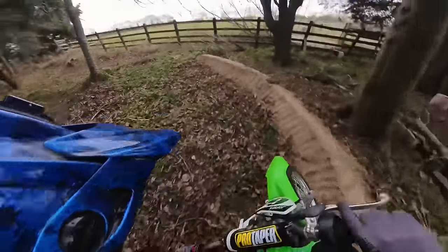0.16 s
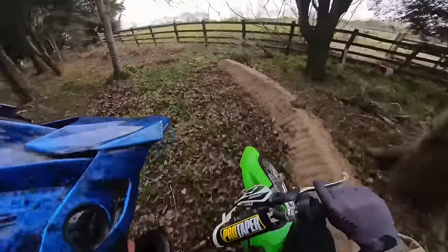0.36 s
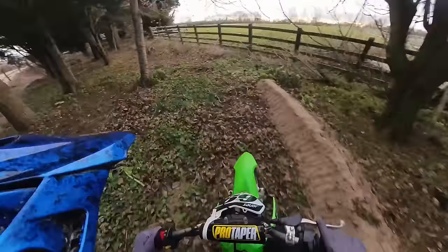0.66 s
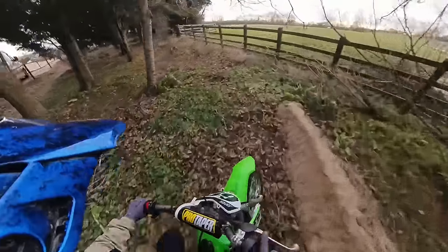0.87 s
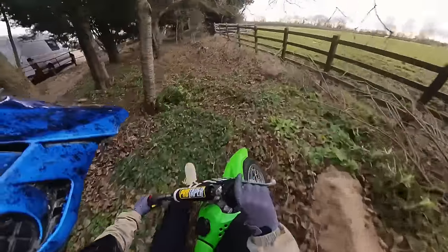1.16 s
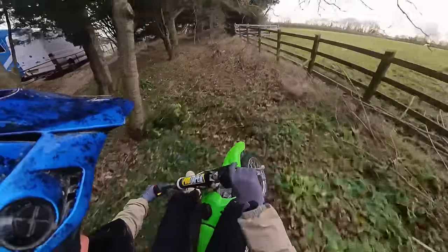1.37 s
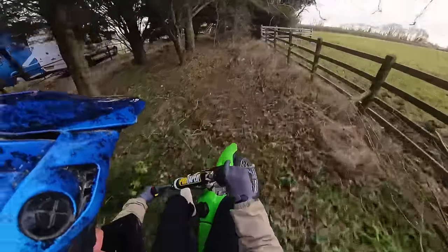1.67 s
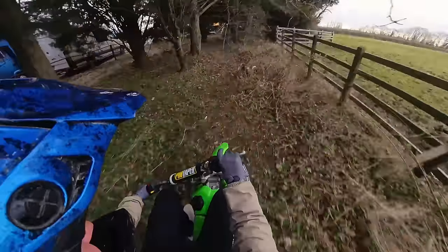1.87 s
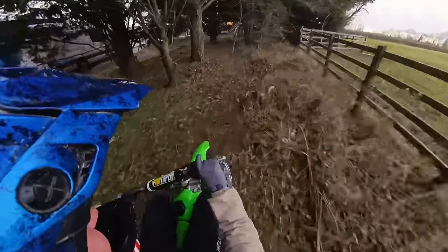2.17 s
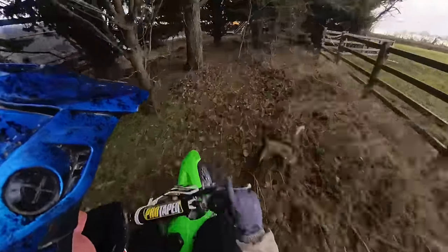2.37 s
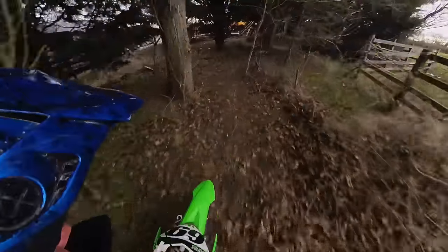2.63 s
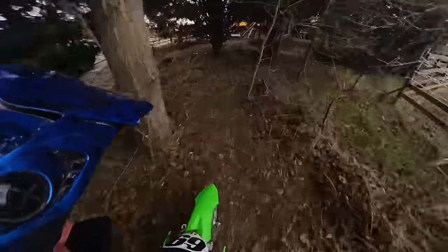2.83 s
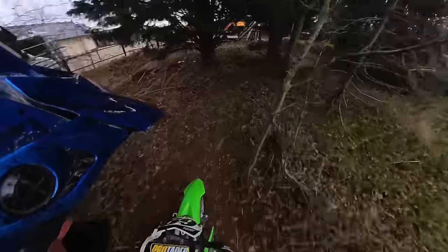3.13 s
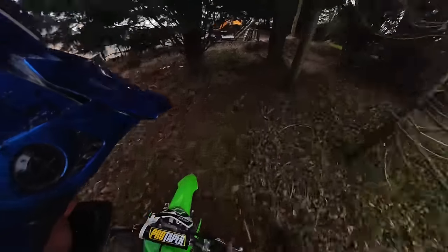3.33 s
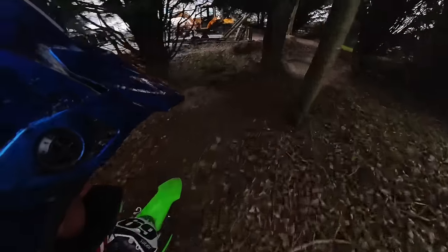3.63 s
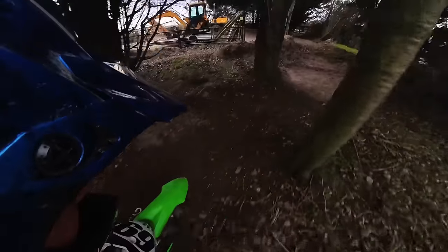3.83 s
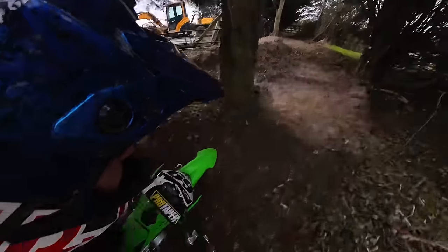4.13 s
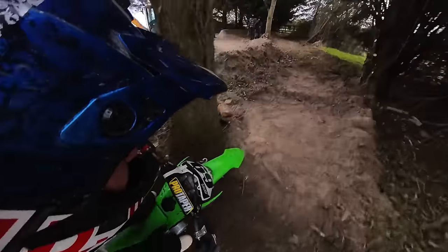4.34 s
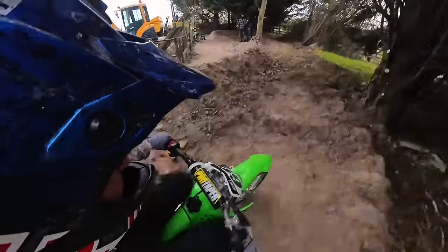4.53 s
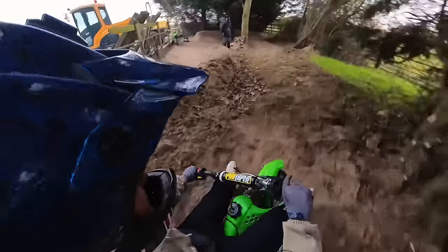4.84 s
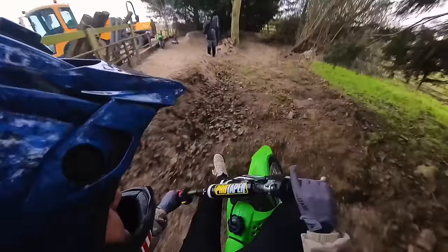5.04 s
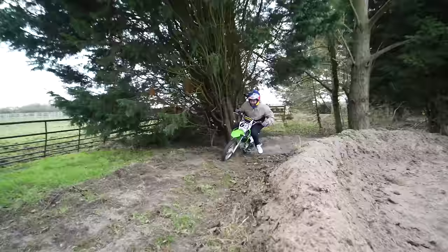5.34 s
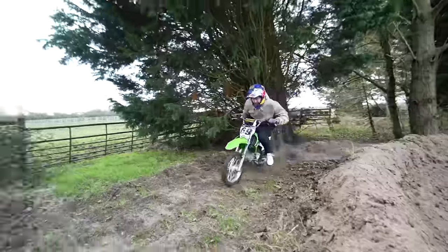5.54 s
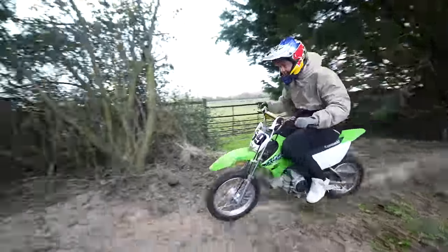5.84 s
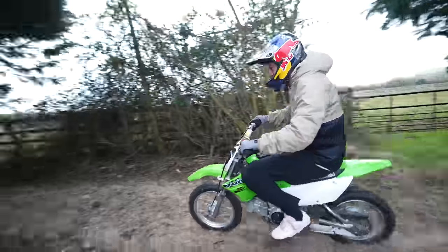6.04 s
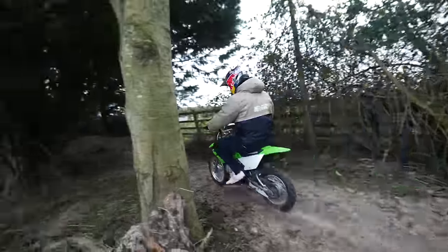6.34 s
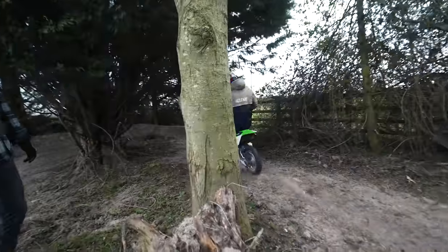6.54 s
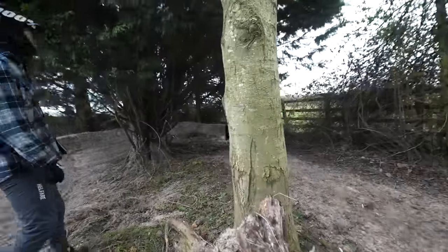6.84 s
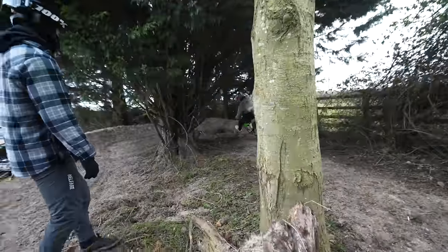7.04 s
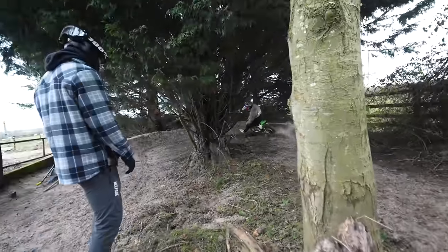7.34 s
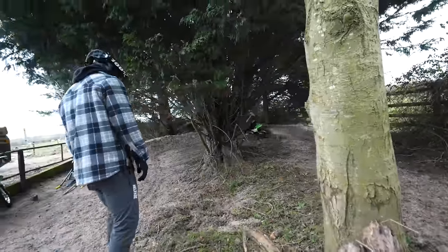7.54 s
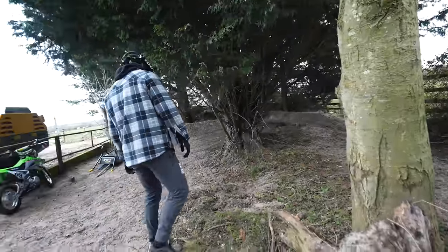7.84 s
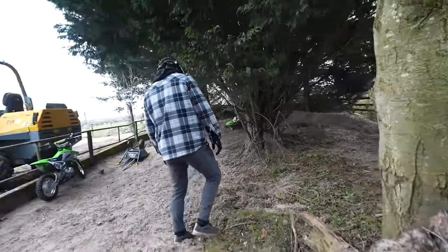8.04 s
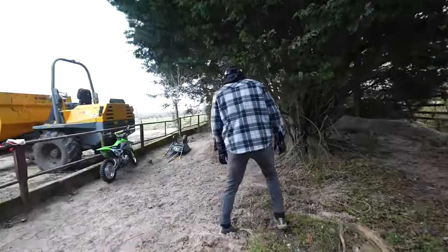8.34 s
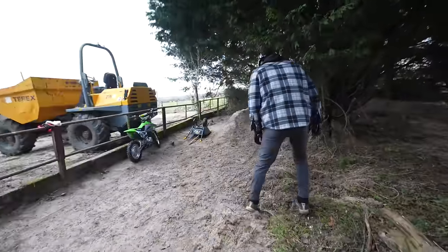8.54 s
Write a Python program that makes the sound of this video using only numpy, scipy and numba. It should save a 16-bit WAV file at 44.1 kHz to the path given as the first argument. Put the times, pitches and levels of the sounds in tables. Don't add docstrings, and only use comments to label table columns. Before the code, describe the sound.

Muffled single-cylinder engine surges and sags through bends with wind hiss and snapping twigs, then barks past outdoors and recedes behind trunks.

```python
import sys
import numpy as np
from scipy import signal
from scipy.io import wavfile
from scipy.ndimage import uniform_filter1d
from numba import njit

SR = 44100
rng = np.random.default_rng(int(sys.argv[2]) if len(sys.argv) > 2 else 0)


def materialize(psi):
    bounded = np.clip(np.atleast_2d(psi).T, -1, 1)
    quanta = np.round(bounded * 32767).astype(np.int16)
    wavfile.write(sys.argv[1], SR, quanta)


def boost_factor(decibels):
    exponent = np.asarray(decibels, float) / 20
    return 10 ** exponent


N = 383669

# start_s, throttle (0-1), pipe_level_db, pipe_centre_hz
RIDER = [(0, 0.97, -26.5, 338), (.2, 0.86, -22, 297), (.38, 1, -17, 308), (.6, 1, -22.5, 307),
         (.95, 0.68, -21, 308.4), (1.25, 0.99, -18.5, 293.2), (2, 0.91, -18.5, 303), (2.35, 0.9, -18, 283),
         (2.9, 0.9, -20, 287), (3, 0.35, -21.5, 339), (3.4, 0.29, -24, 297), (3.62, 0.84, -24.5, 324),
         (3.76, 1, -22, 269), (3.95, 0.99, -23.5, 347), (4.55, 0.99, -26, 352), (4.8, 0.94, -20.5, 300),
         (4.92, 0.66, -16.5, 231), (5.08, 0.92, -21, 287), (5.25, 0.87, -18.5, 325), (5.4, 1, -16.5, 324),
         (5.6, 0.9, -17, 305)]
# start_s, nearness_db, facing (silencer towards us, 0-1), silencer_hz, crank_load_db
BIKE = [(5, -35, 0.4, 470, -26), (5.07, -27.5, 0, 494, -38.5), (5.15, -28, 0.3, 533, -40),
        (5.25, -25.5, 0.06, 606, -9), (5.36, -25.5, 0.36, 586, -20.5), (5.5, -28.5, 0.6, 608, -16),
        (5.7, -29.5, 0.65, 639, -17.5), (5.85, -30.5, 0.48, 628, -15.5), (6.02, -29.5, 0.58, 570.7, -19),
        (6.2, -29, 0.64, 462, -19.5), (6.33, -33.5, 0.74, 470, -20), (6.6, -30.5, 0.3, 436, -25.5),
        (6.68, -36, 0.57, 338, -16.5), (6.88, -41.5, 0.82, 278, -43), (7.2, -40.5, 0.57, 266, -34),
        (7.3, -38, 0, 337, -28), (7.45, -33.5, 0.12, 420, -25), (7.6, -35, 0, 428, -26),
        (7.75, -36.5, 0.15, 420, -25), (7.92, -41.5, 0.1, 427, -22.5), (8.02, -38, 0.13, 450, -16),
        (8.2, -39.5, 0.3, 448, -17), (8.36, -40, 0.24, 495, -21), (8.47, -37.5, 0.37, 610, -17.5),
        (8.7, -36.5, 0.42, 704, -18)]
PASS_S = 6.2


def curves(table):
    s, *columns = np.transpose(table)
    return [np.interp(np.arange(N) / SR, s, column) for column in columns]


def switched(start_s, length_s, edge_s=.005):
    t = np.arange(N) / SR
    return np.clip(np.minimum(t - start_s, start_s + length_s - t) / edge_s + .5, 0, 1)


def walk(rate):
    hold = int(SR / rate)
    steps = np.repeat(rng.standard_normal(N // hold + 1), hold)
    return 2.0 * uniform_filter1d(uniform_filter1d(steps, hold), hold)[:N]


def unit(x):
    return x / np.sqrt(np.mean(x ** 2))


def delayed(x, lag_s):
    return np.roll(x, int(lag_s * SR))


def lowpass(x, hz, order=2):
    return signal.lfilter(*signal.butter(order, hz, fs=SR), x)


@njit
def svf(x, hz, width):
    y, b, l = np.empty(len(x)), 0., 0.
    for i in range(len(x)):
        g, k = np.tan(np.pi * hz[i] / SR), width[i] / hz[i]
        v = (b + g * (x[i] - l)) / (1 + g * (g + k))
        b, l, y[i] = 2 * v - b, l + 2 * g * v, k * v
    return y


def band(x, hz, width, order=2):
    hz, width = np.ones(len(x)) * hz, np.ones(len(x)) * width
    for _ in range(order):
        x = svf(x, hz, width)
    return unit(x / np.sqrt(width))


def ring(x, modes, scale=0.905, wide=1):
    total = 0
    for k, (hz, width, db) in enumerate(modes):
        total = total + (-1) ** k * boost_factor(db) * band(x, hz * scale, 1.117 * width * wide)
    return unit(total)


def beats(turn, hz, jitter_s, scatter_db):
    count = np.arange(np.ceil(turn[0]), turn[-1])
    chance = rng.standard_normal((600, 2))[:len(count)]
    at = np.clip(np.interp(count, turn, np.arange(N)) + jitter_s * SR * chance[:, 0], 0, N - 2)
    i = at.astype(int)
    size = boost_factor(scatter_db * chance[:, 1]) / np.sqrt(hz[i])
    out = np.zeros(N)
    out[i], out[i + 1] = size * (i + 1 - at), size * (at - i)
    return out


def puff(clicks, decay_s, steady):
    gate = signal.lfilter([1], [1, -np.exp(-1 / (decay_s * SR))], clicks)
    return (unit(gate) + steady) * rng.standard_normal(N)


def rattle(clicks, decay_s):
    t = np.arange(2000) / SR
    clatter = rng.standard_normal(len(t)) * np.exp(-t / decay_s)
    return unit(signal.fftconvolve(clicks, clatter)[:N])


def law(rest_db, control_db, per_hz_db, control, hz):
    return rest_db + control_db * control + per_hz_db * (hz - 40)


def firing_rate():
    # start_s, firing_rate_hz
    engine_revs = [(0.0, 29.35), (0.21, 32.14), (0.45, 44.48), (0.71, 31.27), (0.95, 26.77), (1.47, 37.73),
                   (2.08, 44.5), (2.38, 51.76), (2.52, 48.78), (2.92, 54.99), (2.99, 47.64), (3.27, 38.14),
                   (3.53, 21.03), (3.64, 27.06), (3.73, 27.44), (3.9, 44.32), (4.02, 48.13), (4.78, 46.66),
                   (5.15, 53.86), (5.26, 50.62), (5.46, 58.22), (5.72, 60.96), (6.09, 60.3),
                     (6.22, 55.49), (6.32, 47.93), (6.45, 46.42), (6.62, 49.81), (6.86, 41.67),
                     (7.28, 37.69), (7.36, 40.13), (7.5, 46.82), (7.62, 39.82), (7.7, 38.83), (8.0, 41.58),
                     (8.31, 35.04), (8.7, 41.42)]
    # centre_s, length_s, change_hz
    ruts = [(0.34, 0.11, -1.62), (0.46, 0.2, 1.1), (0.54, 0.08, 0.53), (0.62, 0.11, -0.25),
            (0.86, 0.15, -0.38), (1.2, 0.15, -0.47), (1.48, 0.27, 0.78), (1.64, 0.2, -1.42),
            (1.84, 0.2, 1.37), (2.0, 0.15, -1.24), (2.1, 0.11, 0.59), (2.22, 0.15, -0.78),
            (2.36, 0.2, 0.85), (2.48, 0.11, -0.32), (2.68, 0.27, -0.51), (2.82, 0.15, 0.47),
            (2.98, 0.15, 0.92), (3.1, 0.15, -0.39), (3.26, 0.15, 0.5), (3.38, 0.15, -0.54),
            (3.58, 0.15, -0.9), (3.66, 0.15, -0.37), (3.72, 0.2, 1.23), (3.9, 0.27, -0.59),
            (4.1, 0.2, 1.03), (4.32, 0.36, -0.88), (4.5, 0.2, 0.23), (4.6, 0.2, 1.31), (4.76, 0.15, -1.31),
            (4.86, 0.15, 1.26), (4.98, 0.2, -1.03), (5.14, 0.15, 0.82), (5.28, 0.27, -0.25),
            (5.4, 0.11, 0.87), (5.48, 0.11, -0.57), (5.58, 0.11, 0.62), (5.66, 0.08, -1.17),
            (5.72, 0.08, 0.85), (5.82, 0.08, 0.73), (5.9, 0.11, -1.55), (5.98, 0.2, 0.22),
            (6.26, 0.2, 0.65), (6.4, 0.11, -1.8), (6.52, 0.08, -0.33), (6.64, 0.27, 0.87),
            (6.9, 0.2, -0.42), (7.04, 0.15, 0.45), (7.26, 0.36, -0.5), (7.36, 0.11, -0.5),
            (7.52, 0.36, 0.66), (7.74, 0.2, -0.83), (7.84, 0.2, 0.29), (8.06, 0.15, 0.42),
            (8.2, 0.15, -0.26), (8.42, 0.2, -0.57), (8.58, 0.2, 0.82)]
    hz, = curves(engine_revs)
    t = np.arange(N) / SR
    for centre_s, length_s, change_hz in ruts:
        hz = hz + change_hz * np.cos(np.pi * np.clip((t - centre_s) / length_s, -.5, .5)) ** 2
    return hz


def engine_turn(hz):
    # start_s, length_s, extra_delay_s
    timing_shifts = [
        (2.5, .46, -.0018),
        (3.55, .33, -.0016),
        (5.62, .4, .0015),
        (6.287, .126, .0035),
        (6.43, .19, -.0015),
        (6.622, .63, .0015),
        (7.3, .24, -.0012),
        (7.548, .15, .0027),
    ]
    turn = np.cumsum(hz) / SR - .334 + .004 * walk(11)
    return turn - hz * sum(lag_s * switched(s, length_s, .012) for s, length_s, lag_s in timing_shifts)


def crank_levels(hz):
    # start_s, level_db
    first_under = [(5.2, -5), (5.55, -23), (5.8, -13.5), (6.1, -7), (6.4, -13), (7.6, -12), (8.2, -14),
                   (8.7, -15)]
    throttle, load_db = curves(RIDER)[0], curves(BIKE)[3]
    changed = switched(5.3, N / SR, 0.091)
    far_first_db = load_db + curves(first_under)[0] + 0.14 * (hz - 50)
    second_db = (1 - changed) * law(-41, 13, 0.24, throttle, hz) + changed * load_db
    first_db = (1 - changed) * law(-53.5, 13.2, 0.64, throttle, hz) + changed * far_first_db
    return second_db + 0.5 * walk(5.0), first_db + 1.4 * walk(8.6)


def crank_hum(turn, fade, second_db, first_db):
    second = np.cos(2 * np.pi * (2 * turn - .38 + 0.074 * fade))
    first = np.cos(2 * np.pi * (turn + 0.54 * fade))
    return np.sqrt(2) * (boost_factor(second_db) * second + boost_factor(first_db) * first)


def rumble(first_db):
    gain = boost_factor(np.minimum(first_db, -35) - 2.5 + 1.5 * walk(2.2))
    gain = gain + boost_factor(-34.5) * switched(PASS_S, N / SR)
    shake = band(rng.standard_normal(N), 72, 160)
    return gain * signal.lfilter(*signal.butter(2, 34, 'high', fs=SR), shake)


def helmet_exhaust(turn, hz, firing, gulp, throttle, stumble, header_shade_db):
    # multiple_of_centre, width_hz, level_db
    pipe_modes = [(0.757, 71, 8.5), (0.999, 61.3, 14), (1.248, 78, 9), (1.55, 79, -4)]
    # centre_hz, width_hz, level_db
    header_modes = [(131, 8.7, 13), (167, 58.5, 24)]
    _, pipe_db, pipe_hz = curves(RIDER)
    drive = (1 - 0.46 * stumble) * unit(firing) + (.15 + .1 * throttle) * unit(gulp)
    drive = drive + .45 * throttle * (1 - stumble) * rattle(firing, .007)
    drive = drive + .18 * unit(puff(firing, .02, 1.5))
    narrowing = .35 * throttle * np.clip((46 - hz) / 10, 0, 1)
    pipe = boost_factor(pipe_db) * ring(drive, pipe_modes, pipe_hz, 1 - narrowing)
    header_db = law(-28.5, 0.19, -0.2, throttle, hz) + header_shade_db
    header = boost_factor(header_db) * ring(drive, header_modes, (hz / 40) ** .5)
    overrun_db = law(-18, -21, 0, throttle, hz)
    overrun = boost_factor(overrun_db) * np.cos(2 * np.pi * (3 * turn + .25))
    kick = boost_factor(-22.5) * stumble * band(delayed(firing, .011), 150, 170)
    return pipe + header + overrun - kick


def helmet_rasp(hz, firing, gulp, throttle, stumble):
    # centre_hz, width_hz, level_db
    shell_modes = [(620, 101, 7.5), (820, 210, 2), (1175, 340, 2), (1581, 215, -2.5), (2090, 890, -6)]
    ticks = .7 * band(delayed(firing, .0033), 850, 1500) / 4 + .4 * rattle(firing, .004)
    ticks = hz / 45 * ticks * (1 - .6 * stumble) * (.4 + .6 * throttle)
    ticks = ticks + .75 * unit(puff(firing + .5 * gulp, .012, 1.1))
    level_db = law(-41.5, 8.2, 0.084, throttle, hz)
    return boost_factor(level_db) * ring(ticks, shell_modes, 0.898 + 0.023 * walk(4.03))


def helmet_hiss(hz, firing, throttle, wind_shade_db):
    # centre_hz, width_hz, level_db
    hiss_bands = [(2850, 610, -2.5), (4170, 2300, 3), (6600, 7400, 2), (10040, 4300, -3.5)]
    mid = side = 0
    gust_db = law(-65.5, 12.9, 0, throttle, hz) + wind_shade_db - 6 + .3 * walk(6) + .6 * walk(40)
    for centre_hz, width_hz, db in hiss_bands:
        flutter = boost_factor(gust_db + db + .8 * walk(9) + 1.4 * walk(60))
        mid = mid + flutter * band(puff(firing, 0.015, 3.4), 0.985 * centre_hz, 0.95 * width_hz)
        side = side + flutter * band(puff(firing, 0.015, 3.4), 0.985 * centre_hz, 0.95 * width_hz)
    return mid, boost_factor(-6) * side


def airbox(firing):
    # start_s, length_s, level_db, centre_hz, width_hz
    notes_sung = [(0.211, 0.18, -18, 290, 55), (0.391, .15, -25.5, 343, 70),
                  (0.553, 0.14, -19.5, 291, 44.7), (0.79, 0.36, -27, 291.5, 35),
                  (1.189, 0.31, -17.5, 285, 39.7), (1.497, 0.6, -23.5, 314, 60.6),
                  (2.1, .7, -27, 296.3, 60), (2.252, 0.21, -39, 604, 80), (2.55, 0.42, -35.5, 686, 80),
                  (2.99, 0.24, -27.5, 296, 58.6), (3.952, 0.78, -31.5, 424, 78.4),
                  (4.822, 0.29, -24, 252, 60), (5.13, 0.095, -26, 269, 60)]
    out = 0
    for upper, rest_hz, rest_width_hz in [(False, 300., 50.), (True, 600., 80.)]:
        gain, centre, wide = np.zeros(N), np.full(N, rest_hz), np.full(N, rest_width_hz)
        for s, length_s, db, hz, width_hz in notes_sung:
            if (hz > 500) == upper:
                on = switched(s, length_s, 0.022)
                gain = gain + on * boost_factor(db)
                centre = centre + on * (hz - centre)
                wide = wide + on * (width_hz - wide)
        ringing = band(firing, centre, wide)
        out = out + gain * ringing / np.sqrt(uniform_filter1d(ringing ** 2, SR // 6))
    return out


def helmet(turn, hz):
    # start_s, header_db, wind_db
    shade = [(0, 2, 0), (.3, 1, -3), (.6, 0.5, -1.5), (.9, 0, 2.5), (1.2, -1.5, 3), (1.5, -1, 1),
             (1.9, 1, -3), (2.2, -2.5, -3), (2.45, -3.5, 0), (2.8, 7.5, 0), (3, 2.5, 0), (3.5, -5, 0.5),
             (3.7, 10, -3), (4.1, -3.5, 0), (4.3, 3, 0), (4.6, -0.5, 0.5), (4.8, 0, -3.5), (5, 8.5, -8)]
    header_shade_db, wind_shade_db = curves(shade)
    throttle = curves(RIDER)[0]
    turn = turn + .0068 * hz
    firing = beats(turn, hz, .0001, .8)
    gulp = beats(turn + .45, hz, .0003, 1.5)
    stumble = switched(3.54, .24)
    exhaust = helmet_exhaust(turn, hz, firing, gulp, throttle, stumble, header_shade_db)
    rasp = helmet_rasp(hz, firing, gulp, throttle, stumble)
    mid, side = helmet_hiss(hz, firing, throttle, wind_shade_db)
    near = exhaust + airbox(firing) + rasp + mid
    return signal.sosfilt(signal.ellip(8, .2, 60, 13900, fs=SR, output="sos"), near), lowpass(side, 11300, 4)


def twigs():
    # start_s, peak_db, centre_hz, t60_s
    snaps = [(0.4529, -57, 4000, 0.069), (0.9373, -62, 3970, 0.048), (3.269, -45, 3090, 0.057),
             (3.412, -43.5, 5120, 0.087), (3.4511, -47, 3800, 0.043), (3.4635, -59, 3020, 0.053),
             (3.471, -43, 6000, 0.11), (3.561, -35, 6600, 0.21), (3.673, -29, 3840, 0.054),
             (3.756, -70, 3180, 0.06), (3.774, -44, 3920, 0.06), (3.806, -41, 8700, 0.06),
             (3.883, -30.5, 4950, 0.29), (3.9037, -25, 3930, 0.13), (3.9264, -47, 6000, 0.049),
             (4.2218, -38, 4000, 0.056), (4.4355, -40, 4090, 0.043), (4.582, -37, 3660, 0.059),
             (6.148, -19, 3100, 0.044), (6.2343, -17, 6550, 0.045)]
    out, t = np.zeros(N), np.arange(int(.15 * SR)) / SR
    for s, db, hz, t60_s in snaps:
        burst = rng.standard_normal(len(t)) * boost_factor(-60 * t / t60_s)
        snap = band(burst, hz, 1.2 * hz)
        knock = 1.4 * band(burst, 920, 710)
        i = int(s * SR)
        out[i:i + len(t)] += 1.07 * boost_factor(db) * (snap + knock) / np.abs(snap).max()
    return out


def bike(hz):
    # start_s, length_s, crack (0-1), brightening_db, silencer_lift_hz
    bursts = [
        (5.792, 0.23, 0.56, 1.5, -6),
        (6.044, 0.24, 0.87, -0.5, -3),
        (6.424, 0.19, 0.93, 4, 128),
        (7.278, 0.14, 0.85, 0, 132),
        (6.623, .16, 0.78, 1, 0.5),
        (7.31, .228, 0.91, 5.5, 124),
        (7.578, .045, .75, 1.5, 0),
        (7.722, 0.24, 0.88, 4.5, -1),
        (7.962, 0.18, 0.77, 3, 64),
    ]
    # start_s, length_s, level_db, centre_hz (at 40 firings a second), edge_s
    booms = [
        (5.036, 0.64, -23.5, 126, 0.21),
        (5.529, 0.48, -20, 126, 0.25),
        (6.3, 0.11, -15.5, 126, 0.005),
        (6.609, 0.71, -15.5, 132, 0.015),
        (7.288, 0.19, -20, 145, 0.02),
        (7.552, 0.14, -19.5, 140, 0.018),
        (7.73, 0.12, -23.5, 151, 0.057),
        (8.183, 0.94, -20, 180, 0.29),
    ]
    near_db, facing, bark_hz, _ = curves(BIKE)
    crack = 0.16 + (0.51 - 0.16) * switched(PASS_S, N / SR)
    boom_db, bright_db, burst = -27, 0, 0
    for s, length_s, share, db, lift_hz in bursts:
        on = switched(s, length_s)
        crack = crack + on * (share - crack)
        bright_db, burst = bright_db + on * db, burst + on
        bark_hz = bark_hz + on * lift_hz
    crack = crack * (1 - 0.63 * switched(8.1, N / SR, 1.0))
    boom_hz = 140 + 2.97 * (hz - 40) + 29 * burst
    for s, length_s, db, centre_hz, edge_s in booms:
        on = switched(s, length_s, edge_s)
        boom_db, boom_hz = boom_db + on * (db + 27), boom_hz + on * (centre_hz - 140)
    bark_db = near_db + law(0, 24.2, 0, facing, hz) + 0.98 * bright_db
    rasp_db = near_db + law(5.87, 6.8, 0.051, facing, hz) + 0.24 * bright_db
    return boom_db, boom_hz, bark_db, bark_hz, rasp_db, near_db + bright_db, np.clip(crack, .02, .98)


def silencer_boom(early, push, boom_hz, crack):
    swell = 1.11 * band(early, boom_hz, 45 + 220 * crack ** 2)
    return swell - 0.28 * band(delayed(push, 0.00055), boom_hz, 37, order=1)


def silencer_bark(early, push, gush, valve, bark_hz, crack, screened):
    # multiple_of_centre, width_hz, level_db
    bark_modes = [(0.502, 69.5, -3), (0.797, 72, 3), (0.998, 60, 8.5), (1.182, 70, 6), (1.7, 248, -10)]
    drive = .8 * unit(early) + .6 * rattle(early, .01) + .3 * unit(valve)
    drive = drive + .35 * unit(puff(gush, .012, 1.2))
    drive = drive + .8 * screened * unit(puff(gush, .015, 1.5))
    low = 1.5 * screened * band(drive, 0.457 * bark_hz, 150)
    spike = crack * band(push, bark_hz, 390, order=1)
    return low + spike + np.sqrt(1 - crack ** 2) * ring(drive, bark_modes, bark_hz, 0.69 * bark_hz / 450)


def tail_pipe_rasp(early, push, gush, valve, crack, screened):
    # centre_hz, width_hz, level_db
    rasp_modes = [(863, 450, 3.5), (1160, 117, -2), (1457, 360, 2.5), (1960, 270, -9)]
    ticks = .7 * unit(early) + .6 * rattle(early, .003) + .4 * unit(valve)
    ticks = ticks + .65 * unit(puff(gush + .5 * valve, .005, .5))
    ticks = (1 - .5 * screened) * ticks + .6 * screened * rng.standard_normal(N)
    approach = 0.56 * switched(5.02, 0.2, .12)
    whistle_hz = 1440 * (1 + .025 * walk(12)) + 90 * approach
    burr = ring(ticks, rasp_modes, 0.982 + 0.022 * walk(6)) + approach * band(ticks, whistle_hz, 260)
    return crack ** 2 * band(push, 1820, 6600) + np.sqrt(1 - crack ** 2) * burr


def gas_sizzle(gush, valve, crack):
    # centre_hz, width_hz, level_db
    treble_modes = [(2370, 1510, 9), (4690, 1700, -8), (6320, 600, -6.5), (8640, 2900, -20),
                    (9660, 1850, -12)]
    sharp = np.sqrt(crack) * unit(puff(gush, 0.0022, 0.06))
    gas = sharp + np.sqrt(1 - crack) * unit(puff(gush + valve, 0.02, 0.3))
    air = 0.092 * crack ** 2 * band(gas, 9400, 4400)
    return ring(gas, treble_modes) + air


def tail_pipe_whistle(early):
    # start_s, centre_hz, level_db
    whistle_near = [(5.3, 1410, -14.5), (5.332, 1450, -31), (5.672, 1470, -23.5), (5.812, 1390, -14),
                    (5.914, 1330, -21.5), (5.946, 1380, -14), (5.974, 1360, -28), (6.066, 1420, -16),
                    (6.3, 1460, -28)]
    # start_s, centre_hz, level_db
    whistle_far = [(7.7, 1400, -42), (7.95, 1550, -41), (8.05, 1450, -40.5), (8.15, 1590, -34),
                   (8.26, 1450, -32), (8.4, 1390, -46.5), (8.55, 1500, -35), (8.7, 1410, -35)]
    far = switched(7.7, N / SR, .1)
    pipe_hz, pipe_db = curves(whistle_near + whistle_far)
    breath = .6 * unit(puff(early, .005, .25 + 3 * far)) * (1 + far)
    sung = band((1 - .8 * far) * unit(early) + breath, pipe_hz, 280 + 200 * far)
    return boost_factor(pipe_db - 2) * (switched(5.27, 0.91, 0.044) + far) * sung


def open_pulses(turn, hz, push):
    # start_s, thud_db, pop_db
    pops = [(5.1, -44, -25), (5.3, -22.5, -20), (5.5, -22.5, -22.5), (5.72, -24.5, -26), (5.82, -38, -28.5),
            (6.1, -27, -21.5), (6.25, -30, -29), (6.42, -28, -22.5), (6.5, -34, -39), (6.68, -35, -30),
            (6.85, -48, -24), (7.2, -32.5, -35.5), (7.5, -38, -46), (7.75, -39, -45), (8.05, -35, -32),
            (8.2, -41, -44), (8.5, -61, -33), (8.7, -43, -27)]
    thud_db, pop_db = curves(pops)
    pop = boost_factor(pop_db) * band(push, 1030, 1100, order=1)
    half_cycle = 0.76 * beats(turn + .56, hz, .0001, 0.88)
    return pop, boost_factor(thud_db) * band(push + half_cycle, 260, 220, order=1)


def tree_echo(bright):
    t = np.arange(int(.4 * SR)) / SR
    tail = rng.standard_normal(len(t)) * boost_factor(-60 * t / .3) * (t > .008)
    return boost_factor(-13) * signal.fftconvolve(bright, tail / np.linalg.norm(tail))[:N]


def bank_echo(direct):
    return -0.73 * switched(7.55, 0.36, 0.025) * delayed(lowpass(direct, 700), 0.00334)


def trackside(turn, hz):
    boom_db, boom_hz, bark_db, bark_hz, rasp_db, treble_db, crack = bike(hz)
    firing = beats(turn + 0.00164 * hz, hz, .00008, 0.3)
    push = lowpass(firing, 1100)
    gush = delayed(firing, 0.0013)
    valve = beats(turn + .52, hz, 0.00029, 4)
    early = delayed(firing, -.0014)
    screened = switched(8.27, N / SR, 0.22)
    boom = boost_factor(boom_db) * silencer_boom(early, push, boom_hz, crack)
    bark = boost_factor(bark_db) * silencer_bark(early, push, gush, valve, bark_hz, crack, screened)
    rasp = boost_factor(rasp_db) * tail_pipe_rasp(early, push, gush, valve, crack, screened)
    sizzle = boost_factor(treble_db + 0.13 * walk(25)) * gas_sizzle(gush, valve, crack)
    pop, thud = open_pulses(turn, hz, push)
    bright = sizzle - bark - rasp - tail_pipe_whistle(early) - pop
    direct = bright - thud - boom
    return direct + tree_echo(bright) + bank_echo(direct)


def scene():
    hz = firing_rate()
    second_db, first_db = crank_levels(hz)
    turn = engine_turn(hz)
    fade = np.interp(np.arange(N) / SR, (4.84, 6.36), [0, np.pi / 2])
    near, wide = helmet(turn, hz)
    mid = np.cos(fade) * near + np.sin(fade) * trackside(turn, hz)
    mid = mid + crank_hum(turn, fade, second_db, first_db) + twigs() + rumble(first_db)
    side = np.cos(fade) * wide - boost_factor(-35.0) * np.sin(fade) * lowpass(mid, 250)
    return np.array([mid + side, mid - side])


def low_pass(x):
    return signal.sosfilt(signal.butter(12, 15820, fs=SR, output="sos"), x)


def record(dry):
    top = signal.ellip(8, .2, 70, 15750, fs=SR, output="sos")
    return low_pass(signal.sosfilt(top, 0.88 * np.tanh(dry / 0.83)))


dry = scene()
out = record(dry)
materialize(out)
```